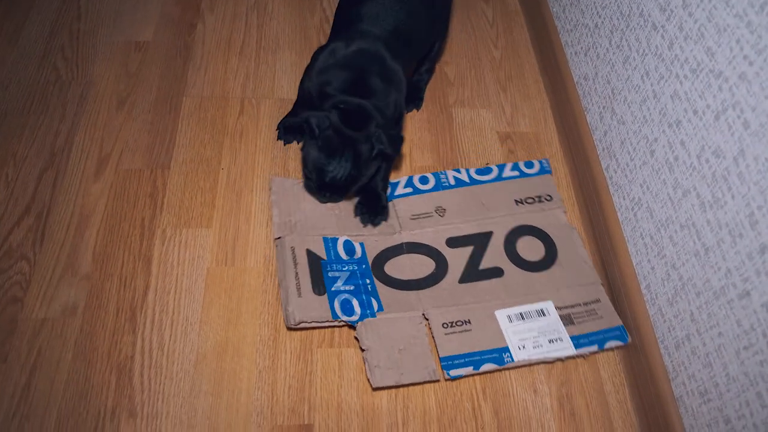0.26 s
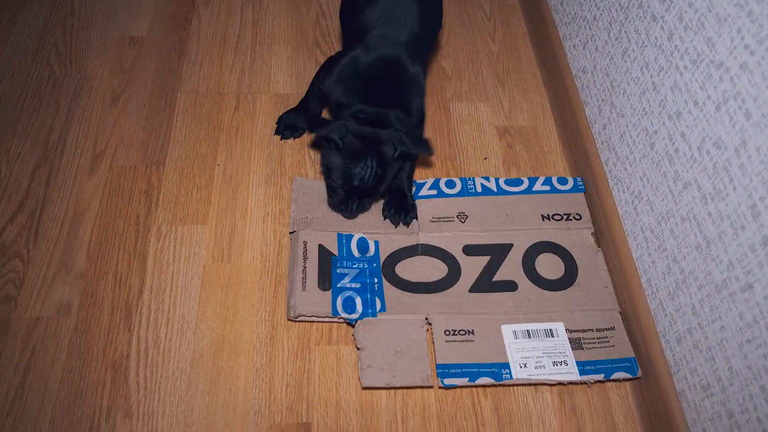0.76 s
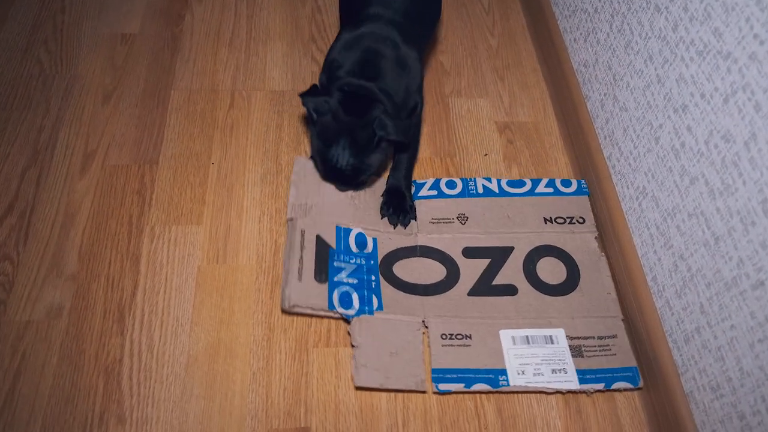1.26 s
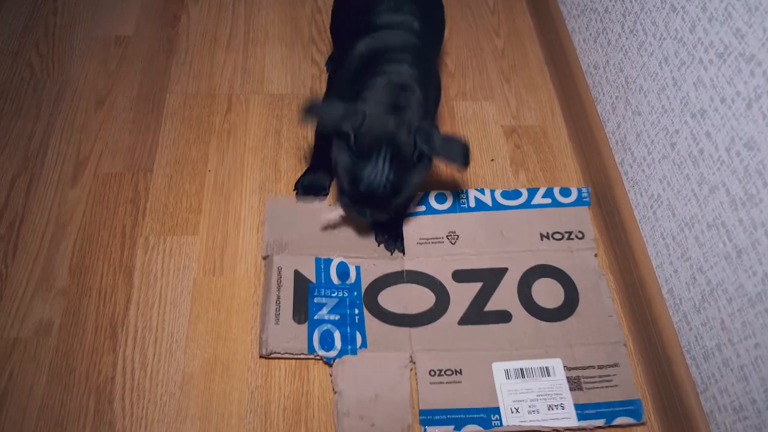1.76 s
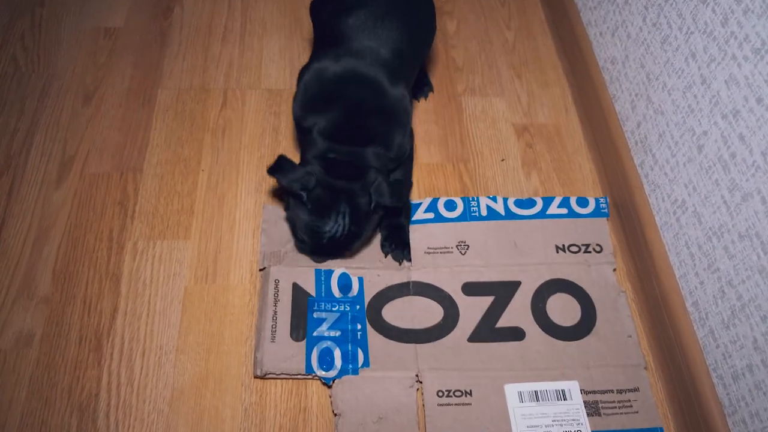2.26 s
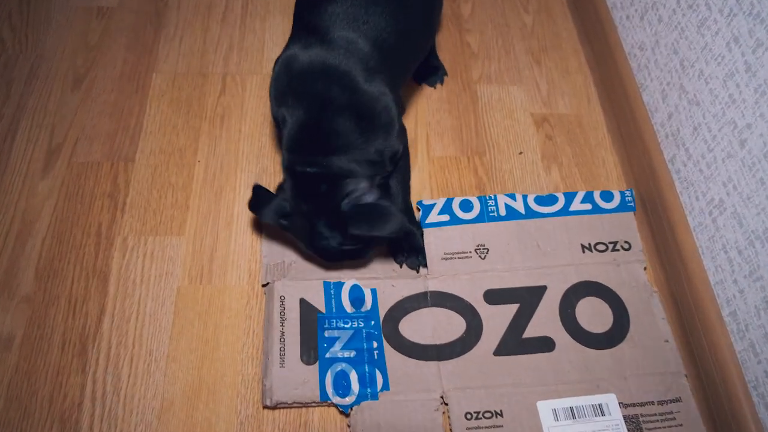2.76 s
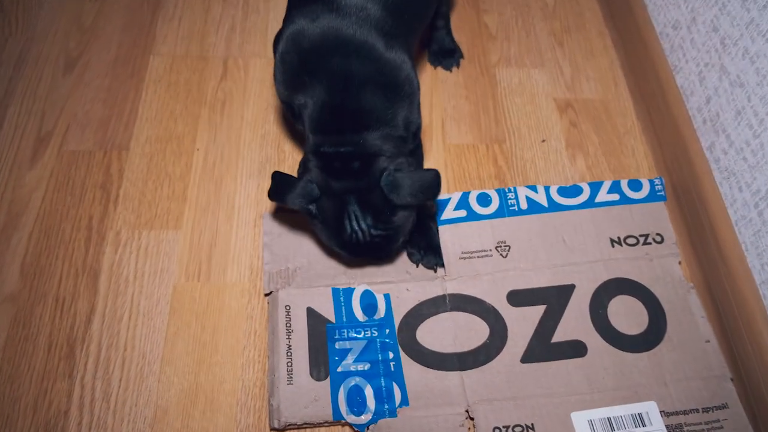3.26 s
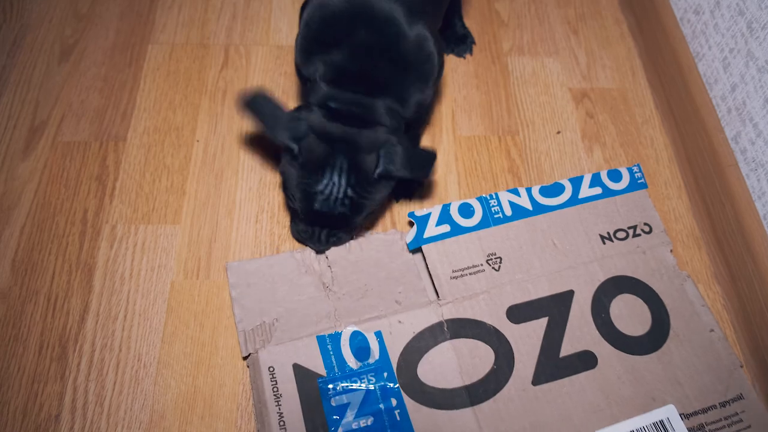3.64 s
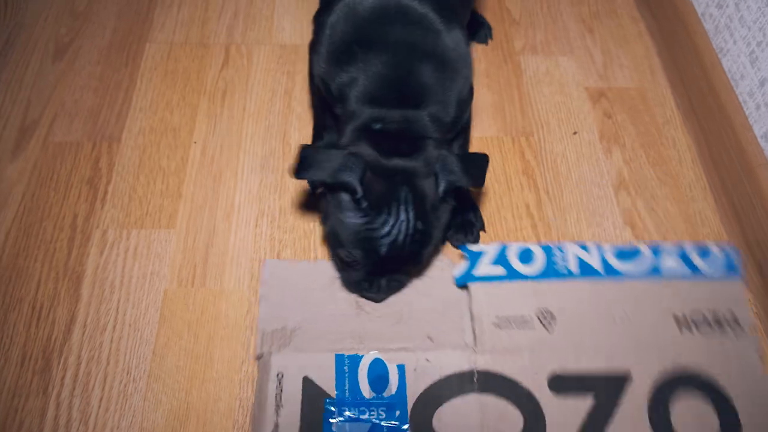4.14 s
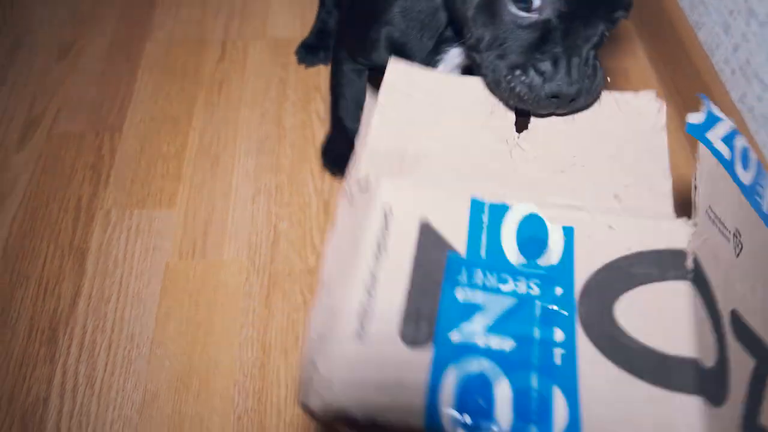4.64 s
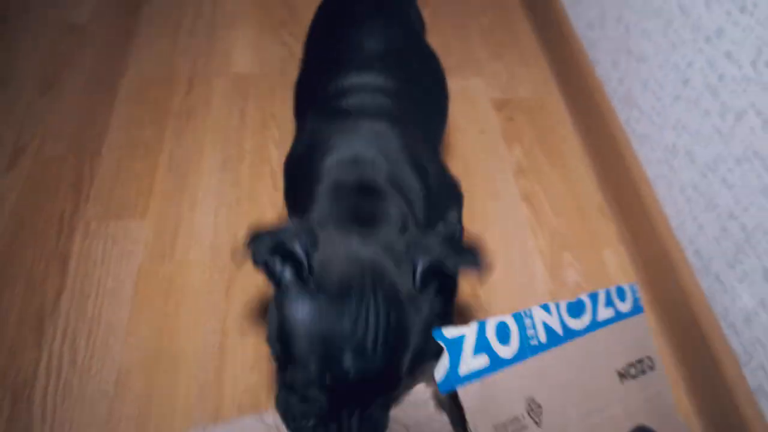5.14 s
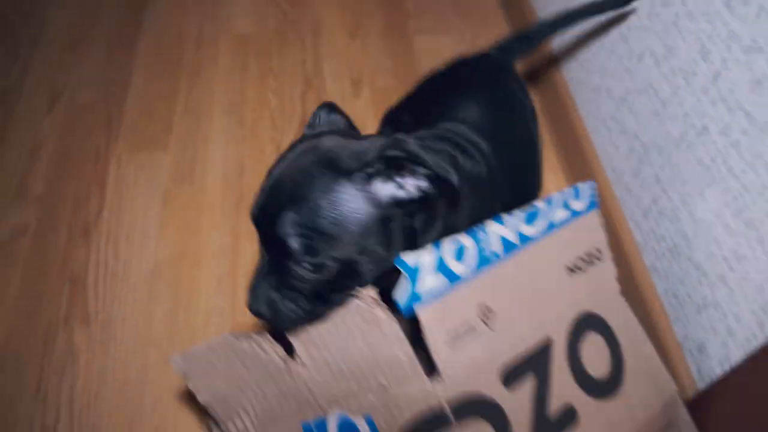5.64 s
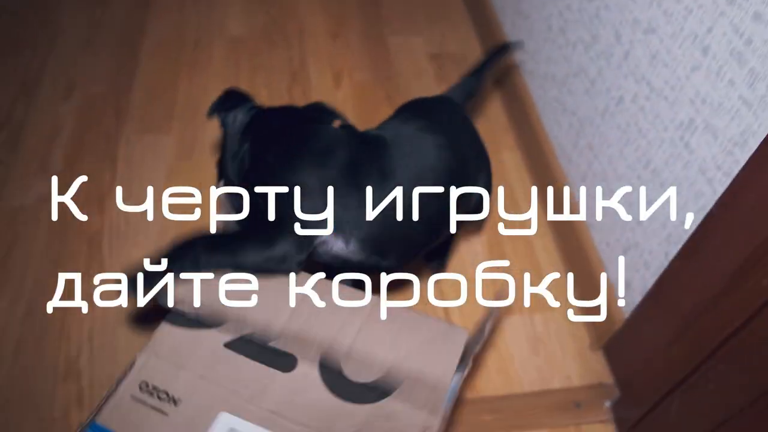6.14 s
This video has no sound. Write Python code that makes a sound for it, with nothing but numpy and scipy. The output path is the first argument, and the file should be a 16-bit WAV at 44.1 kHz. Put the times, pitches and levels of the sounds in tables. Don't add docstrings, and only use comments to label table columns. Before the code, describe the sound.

Close to the microphone, a puppy tears at a flat cardboard box on a wooden floor. A short groan and scrape open, then crisp snaps and crackles cluster, strongest before two seconds. Sparse scrapes, squeaky creaks and tiny tape ticks follow with near-silent gaps. Finally the box is pulled and shaken with hollow flaps, thuds and dense crackling. Short small-room reflections, faint steady air.

```python
import sys
import numpy as np
from scipy import signal
from scipy.fft import rfft, irfft, next_fast_len
from scipy.io import wavfile
from scipy.ndimage import uniform_filter1d, map_coordinates

SR = 44100
rng = np.random.default_rng(int(sys.argv[2]) if len(sys.argv) > 2 else 0)


def put_to_file(sound):
    columns = np.atleast_2d(sound).T
    safe = np.clip(columns, -1, 1)
    whole_steps = np.round(safe * 32767)
    wavfile.write(sys.argv[1], SR, whole_steps.astype(np.int16))


def invert_db(x):
    u = np.asarray(x, float) / 20
    return 10 ** u


N = 282240
CLOCK = np.arange(N) / SR
FAINT_KNOCK_DB = -36


def unit(x):
    return x / np.sqrt(np.mean(x ** 2) + 1e-20)


def along(points, hz):
    f, v = np.transpose(points)
    return np.interp(np.log(hz + 1), np.log(f + 1), v)


def wobble(rate):
    knots = rng.standard_normal(int(N * rate / SR) + 4)
    return map_coordinates(knots, [np.arange(N) * rate / SR])


def filtered(x, response):
    m = next_fast_len(N + 8192)
    return irfft(rfft(x, m) * response(np.fft.rfftfreq(m, 1 / SR)), m)[..., :N]


def rub(spectrum, grain_share, per_second, spread_db, patchy_db):
    # hz, likeness
    likeness = [(60, 0.87), (180, 0.957), (550, 0.885), (1200, 0.925), (2500, 0.1), (5000, 0.055),
                (15000, 0.52)]
    z = signal.stft(rng.standard_normal((2, N)), nperseg=256)[2]
    field = uniform_filter1d(rng.standard_normal(z.shape[1:]), size=4, axis=0)
    field = uniform_filter1d(field, size=12, axis=1)
    noise = unit(signal.istft(z * invert_db(patchy_db * unit(field)), nperseg=256)[1][:, :N])

    slipping = rng.random(N) < per_second / SR
    size_db = spread_db * np.minimum(rng.exponential(size=N), 3)
    push = np.clip(rng.standard_normal((2, N)), -2, 2)
    slips = unit(slipping * invert_db(size_db) * push)

    share = np.clip(grain_share, 0, 1)
    pair = np.sqrt(1 - share) * noise + np.sqrt(share) * slips

    def body(hz):
        turn = np.arccos(np.clip(along(likeness, hz), -1, 1)) / 2
        return invert_db(along(spectrum, hz)) * [np.cos(turn), np.sin(turn)]

    mid, side = filtered(pair, body)
    return unit(np.array([mid + side, mid - side]))


def strokes(s, length, db, rise, fall, fade_db=0):
    steepens = 7000
    t = np.arange(0, N / SR + .004, .002)[:, None]
    held = fade_db * np.clip((t - s) / (np.abs(length) + 1e-3), 0, 1)
    early = np.maximum(s - t, 0)
    late = np.maximum(t - s - length, 0)
    level = db + held - (rise + steepens * early) * early - fall * late
    return np.interp(CLOCK, t[:, 0], np.sqrt(np.sum(invert_db(2 * level), axis=1)))


def quiet_room():
    # hz, level_db (per Hz)
    air_colour = [(15, -32), (25, -3.5), (44, -18), (108, -16.5), (142, -27.5), (191, -19.5), (338, -27.5),
                  (431, -14.5), (921, -24), (1630, -14.5), (2250, -21.5), (15000, -35), (16300, -40)]
    return invert_db(-69.5) * rub(air_colour, grain_share=0, per_second=500, spread_db=0, patchy_db=0)


def groans():
    # start_s, length_s, start_hz, end_hz, level_db
    groan_list = [(0, .04, 205, 190, -47), (.05, .045, 390, 500, -52), (.105, .05, 215, 200, -50),
                  (4.74, .05, 1130, 1150, -58), (4.76, .035, 110, 130, -46), (5.558, .022, 3950, 4050, -43),
                  (.54, .08, 1030, 1020, -56), (1.315, .03, 430, 400, -35), (1.355, .035, 260, 250, -35),
                  (4.6, .13, 1100, 1000, -60), (2.55, .035, 4200, 3800, -62), (2.545, .04, 1300, 1300, -57),
                  (0, 0.2, 190.1, 204.1, -51), (0.036, 0.072, 202.4, 210.4, -42.5),
                  (2.345, 0.068, 293, 306, -59.5), (2.345, .074, 579.2, 612, -52),
                  (2.37, 0.154, 430.5, 463, -54.5), (2.44, 0.124, 599, 567, -62.5),
                  (2.959, 0.086, 253, 246, -53.5), (4.188, 0.078, 428.9, 406.4, -54.5),
                  (4.51, 0.135, 270.6, 220.6, -52), (1.1, 0.14, 201.3, 218.5, -54.5),
                  (2.26, 0.175, 1400, 1400, -49), (2.82, 0.1, 1980, 1960, -44),
                  (2.9, 0.27, 2000, 1906, -65), (.992, .07, 3050, 2500, -46),
                  (2.825, 0.065, 2282, 2270, -39)]
    # pitch_hz, level_db
    buzz = [(200, -6), (250, -22.5), (2000, -26)]
    out = np.zeros(N)
    flutter, throb = 1 + .06 * wobble(80), invert_db(4 * wobble(60))
    for s, length, from_hz, to_hz, db in groan_list:
        part = slice(round(s * SR), round((s + length) * SR))
        u = np.clip((CLOCK[part] - s) / length, 0, 1)
        hz = (from_hz + (to_hz - from_hz) * u) * flutter[part]
        turns = 2 * np.pi * np.cumsum(hz) / SR
        tone = np.sin(turns) + invert_db(along(buzz, from_hz)) * np.sin(2 * turns)
        out[part] += invert_db(db + 5.5) * np.sin(np.pi * u ** 0.609) ** 2 * tone
    return out * throb


def pull(bright, quicker):
    # start_s, board_db, hiss_above_board_db, time_to_die_by_20_db_s
    tug_list = [(0, -55, -0.5, 0.5), (0.072, -51.5, 3.5, 0.2449), (.14, -40, -6.5, 0.3),
                (.19, -33.5, -7.5, 0.15), (.23, -39.5, -24, 0.2031), (.68, -46.5, -4, 0.1551),
                (.98, -48, -6, 0.72), (1.3, -46.5, 7.5, 0.08), (1.37, -33, -28.5, 0.0018),
                (1.412, -46, 10, 0.1418), (1.572, -38, 0, 0.21), (1.692, -24, -2.5, 0.0655),
                (2.07, -70.5, 3.5, 2.06), (2.765, -51.5, 18.5, 0.1733), (3.912, -41, -3.5, 0.06),
                (4.03, -37.5, -8, 0.0651), (4.788, -52, 2, 0.1), (5.003, -31, -10, 0.0285),
                (5.17, -49, 12, 0.0856), (5.218, -35.5, -8, 0.4), (5.583, -25.5, -8.5, 0.1353),
                (5.785, -36, -9, 0.34), (5.853, -28, -5, 0.0533)]
    # start_s, length_s, board_db, hiss_above_board_db, fade_over_stroke_db
    slide_list = [(0.365, 0.2182, -41, -9, -9), (0.716, 0.136, -57.5, 1.5, 0),
                  (0.871, 0.089, -56, -1.5, 11.5), (1.036, 0.149, -59.5, -2, 1),
                  (1.239, 0.0687, -44.5, 1, 8), (1.411, 0.074, -35.5, -11.5, -3.5),
                  (1.738, 0.0943, -35, -10, -1.5), (2.232, 0.1784, -51.5, -0.5, 1.5),
                  (2.548, 0.097, -57, -3, -4.5), (2.701, 0.0936, -44.5, 0, 7),
                  (2.786, 0.0764, -38, -6.5, 1), (3.461, 0.1113, -38, -1.5, -0.5),
                  (3.614, 0.19, -49.5, -1.5, -8.5), (4.065, 0.1474, -46.5, 1, -3.5),
                  (4.198, 0.2155, -52.5, 0, 2.5), (4.489, 0.2047, -49, -3.5, -3), (4.875, 0.062, -50, 4, 4),
                  (5.042, 0.15, -43.5, -4, -1.5), (5.36, 0.165, -32.5, -5, 1.5),
                  (5.603, 0.1217, -38.5, -2.5, -2), (5.879, 0.086, -36, -2, 1),
                  (6.034, 0.141, -42.5, -5, 2), (6.187, 0.115, -41, -5.5, -3), (6.349, .05, -44, -5.5, 0.5),
                  (1.672, .035, -35, 0, 2), (2.69, .02, -50, 3, 0), (3.895, .06, -48, -3, -3),
                  (3.985, .03, -52, -6, 0), (4.755, .015, -53, -4, 0), (4.8, .07, -54, 0, -2),
                  (5.125, .07, -52, 8, 0), (5.34, .05, -38, 0, 0), (5.562, .03, -36, -3, 0),
                  (3.448, .015, -46, 3, 0), (.28, .07, -46, -14, -2), (5.26, .04, -38, -14, 0)]
    s, db, over_db, dies = np.transpose(tug_list)
    tugs = strokes(s, 0, db + bright * over_db, rise=449.5, fall=quicker * 20 / dies)
    s, length, db, over_db, fade_db = np.transpose(slide_list)
    slides = strokes(s, length, db + bright * over_db, rise=521.5, fall=quicker * 131, fade_db=fade_db)
    return np.hypot(slides, tugs)


def bent(x, peak_hz, boost_db, octaves):
    hz, t, z = signal.stft(x, SR, nperseg=512)
    centre = np.interp(t, CLOCK, peak_hz)
    bump = np.exp(-(np.log2((hz[:, None] + 1) / centre) / octaves) ** 2)
    return unit(signal.istft(z * invert_db(boost_db * bump), SR, nperseg=512)[1][:, :N])


def board_scrape():
    # hz, level_db (per Hz)
    board_colour = [(250, -47), (400, -14), (600, -7.5), (800, -5), (980, -1.5), (1190, -3.5), (1400, -3),
                    (1800, -2), (2400, -3.5), (3500, -12), (5300, -34), (9000, -38.5), (16000, -73)]
    # time_s, note_hz
    flap_note = [(0, 1900), (.3, 1400), (.6, 1030), (.9, 1650), (1.6, 1350), (1.75, 1000), (2.3, 1400),
                 (2.75, 1550), (2.86, 2000), (3.5, 1500), (4.0, 1120), (4.17, 1850), (4.5, 1180),
                 (4.72, 1000), (4.95, 1130), (5.5, 1450), (5.6, 1700), (6.4, 1500)]
    # time_s, resonance_hz
    fold = [(0, 1550), (.2, 1750), (.6, 1200), (.85, 1650), (1.69, 1100), (2.6, 1450), (2.87, 2050),
            (3.9, 1200), (4.201, 1600), (4.75, 1050), (5.47, 1430), (5.56, 1150), (5.7, 1400), (6.4, 1600)]
    shake = rub(board_colour, grain_share=0.29, per_second=1500, spread_db=0.5, patchy_db=3.0)
    shake = bent(shake, np.interp(CLOCK, *np.transpose(flap_note)), boost_db=2.6, octaves=0.16)
    return bent(shake, np.interp(CLOCK, *np.transpose(fold)), boost_db=4.0, octaves=0.53)


def polished(x):
    # time_s, tilt_db_per_octave
    gloss = [(0, -4), (.3, -4), (.5, 2), (.93, 8), (1.0, -3), (1.5, -2), (1.7, 4), (2.05, 1), (2.45, 4),
             (2.62, 4), (2.75, -3), (3.05, -3), (3.5, 2), (3.95, -1), (4.5, -1), (5.05, 2), (5.5, 0),
             (6.4, -3)]
    pivot_hz = 7000
    hz, t, z = signal.stft(x, SR, nperseg=512)
    octaves = np.log2(np.maximum(hz, pivot_hz) / pivot_hz)[:, None]
    tilt_db = octaves * np.interp(t, *np.transpose(gloss))
    return signal.istft(z * invert_db(tilt_db), SR, nperseg=512)[1][:, :N]


def surface_hiss():
    # hz, level_db (per Hz)
    hiss_colour = [(700, -60.5), (1500, -17), (2500, -4.5), (3500, -5.5), (4800, -7), (5500, -11),
                   (6700, -7.5), (9000, -11.5), (15000, -18), (16300, -22)]
    return polished(rub(hiss_colour, grain_share=0.08, per_second=1400, spread_db=5.5, patchy_db=1.86))


def sheet_boom(force):
    # start_s, length_s, level_db
    flap_list = [(0, 0.015, -42.5), (0.061, 0.011, -38.5), (.09, 0.12, -45.5), (0.298, 0.266, -61),
                 (0.69, 0.098, -52.5), (.87, .01, -54.5), (0.99, 0.012, -42), (1.149, 0.0072, -53.5),
                 (1.307, 0.015, -26), (1.365, .11, -33.5), (1.574, 0.0074, -32.5), (1.681, 0.0072, -25.5),
                 (1.753, 0.122, -39), (2.375, 0.044, -51.5), (2.0, .2, -65), (3.531, 0.0083, -45),
                 (3.725, 0.0077, -59.5), (3.996, 0.087, -51), (4.248, .01, -51), (4.537, 0.0776, -43.5),
                 (4.66, 0.052, -55), (4.784, .01, -45), (4.888, 0.053, -43), (5.046, 0.071, -46.5),
                 (5.213, 0.048, -35), (5.307, 0.0916, -32), (5.581, 0.24, -41.5), (5.834, 0.0107, -25),
                 (5.942, 0.09, -31.5), (6.076, 0.254, -41.5)]
    # hz, level_db (per Hz)
    sheet_colour = [(88, -41), (150, -12), (193, 0), (300, -1.5), (333, -12), (423, 1), (457, -4.5),
                    (515, 0.5), (556, -4.5), (617, -2), (800, -9), (1040, -36), (1760, -120)]
    flap = strokes(*np.transpose(flap_list), rise=300.5, fall=218)
    flap = np.hypot(flap, invert_db(-22.5) * force)
    boom = rub(sheet_colour, grain_share=0.2, per_second=200, spread_db=6.0, patchy_db=-0.5)
    return flap * invert_db(-7.5 + 0.35 * wobble(22)) * boom


def floor_thud():
    # start_s, length_s, level_db
    paw_list = [(0, 0.006, -60), (0.672, 0.189, -55.5), (1.3, 0.098, -57), (1.578, 0.0124, -50),
                (1.696, 0.117, -51), (1.852, 0.075, -52.5), (3.555, 0.057, -54), (4.061, 0.017, -52),
                (4.23, 0.0096, -56.5), (4.59, 0.0175, -62.5), (4.779, 0.0093, -47.5), (4.88, 0.0094, -49),
                (5.04, .25, -65), (5.355, 0.04, -43.5), (5.5, 0.3, -57.5), (5.815, 0.0074, -42),
                (5.958, .01, -51.5), (6.089, 0.034, -59.5), (6.278, 0.118, -48.5)]
    # hz, level_db (per Hz)
    floor_colour = [(12, -46.5), (25, -21), (45, -11), (68, 0.5), (80, -6.5), (100, 2), (125, -6.5),
                    (150, -20.5), (220, -47.5), (400, -100)]
    land = strokes(*np.transpose(paw_list), rise=350.5, fall=160)
    land = np.hypot(land, invert_db(-74.5))
    thud = rub(floor_colour, grain_share=0.12, per_second=51, spread_db=2.0, patchy_db=1.29)
    return land * invert_db(1.1 * wobble(11)) * thud


def drag():
    force = pull(bright=0, quicker=1)
    jerk = invert_db(1.3 * wobble(60))
    board = force * jerk * board_scrape()
    hiss = pull(bright=1, quicker=1.43) * jerk * surface_hiss()
    return board + hiss + sheet_boom(force) + floor_thud()


def snaps(events, tear_s, gain_db, swing, left_db):
    scatter_db = 1.5
    out, t = np.zeros((2, N + SR)), np.arange(2048) / SR
    f = np.fft.rfftfreq(len(t), 1 / SR)

    def mode(hz, width):
        return 1j * f * width / (hz * hz - f * f + 1j * f * width)

    def peak_one(x):
        return x / np.abs(x).max()

    swell = (t / tear_s) ** 2 * np.exp(-t / tear_s)
    treble = mode(5000, 9000) * mode(4000, 7000)
    dice = rng.random((len(events), 3))
    grit = rng.standard_normal((len(events), 3, len(t)))
    for (s, db, hz, crack_db, knock_db), d, g in zip(events, dice, grit):
        tear = rfft(g * swell)
        ripple = rfft(swing * np.sin(2 * np.pi * (hz * t + d[1])) * swell)
        body = mode(hz, .75 * hz) * mode(hz, 1.8 * hz) - invert_db(-5) * mode(1.9 * hz, 1.3 * hz) ** 2
        ring = peak_one(irfft((ripple + tear[0] + 0.41 * tear[1:]) * body))
        crack = peak_one(irfft((1.1 * tear[0] + tear[1:]) * treble))
        knock_swell = invert_db(-60 * t / 0.043) * (1 - np.exp(-t / 0.0046))
        knock = knock_swell * np.sin(2 * np.pi * (220 + 90 * d[0]) * t)
        snap = ring + invert_db(crack_db + 6.0) * crack + invert_db(knock_db + 6.11) * knock
        pan_db = left_db + scatter_db * (2 * d[2] - 1)
        start = max(round((s - .8 * tear_s) * SR), 0)
        out[:, start:start + len(t)] += invert_db(db + gain_db) * snap * invert_db([[pan_db / 2], [-pan_db / 2]])
    return out[:, :N]


def pinned_snaps():
    # time_s, peak_db, board_pitch_hz, crack_above_peak_db
    snap_list = [(0.131, -22, 2225, -30.5), (0.18, -4.5, 1460, -18), (0.689, -22.5, 1700, -17),
                 (0.951, -19.5, 1513, -15.5), (0.979, -3, 1400, -16), (1.23, -31, 1466, -7.5),
                 (1.263, -7, 1196, -15), (1.292, -9.5, 1440, -9.5), (1.323, -10.5, 1239, -33),
                 (1.345, -20, 1500, -19), (1.407, -12.5, 983, -10.5), (1.563, -7, 1112, -12),
                 (1.659, -15, 1248, -12), (1.678, -11.5, 1270, -11), (1.688, -10, 875, -8),
                 (1.838, -14.5, 1325, -21), (2.225, -24.5, 1387, -21.5), (2.261, -32, 1670, -20)]
    events = np.insert(snap_list, 4, FAINT_KNOCK_DB, axis=1)
    return snaps(events, tear_s=.0007, gain_db=2.0, swing=0.37, left_db=0.3)


def fibre_crackles():
    # time_s, peak_db, board_pitch_hz, crack_above_peak_db
    crackle_list = [(0.144, -25, 1550, -22), (0.194, -16, 1600, -20), (0.389, -28, 1340, -24),
                    (0.752, -36, 1500, -21), (0.993, -23, 2860, -20), (1.279, -19, 1600, -20),
                    (1.331, -18, 1880, -25), (1.398, -13, 1500, -21), (1.418, -20, 1770, -19),
                    (1.444, -23, 1730, -20), (1.55, -28, 1440, -26), (1.612, -21, 1480, -23),
                    (1.663, -12, 1220, -23), (1.672, -13, 910, -17), (1.683, -8, 1360, -15),
                    (1.692, -8, 1240, -19), (1.71, -17, 1800, -14), (1.749, -20, 1500, -24),
                    (1.926, -36, 1370, -30), (2.247, -30, 1440, -26), (2.573, -43, 1310, -16),
                    (2.844, -21, 2270, -19), (3.481, -25, 1410, -21), (3.527, -26, 1540, -16),
                    (3.565, -27, 1400, -11), (4.023, -27, 1050, -24), (4.03, -28, 1240, -21),
                    (4.07, -33, 1660, -14), (4.492, -28, 1140, -28), (4.784, -34, 945, -15),
                    (4.864, -38, 1140, -10), (4.899, -33, 2400, -10), (5.337, -18, 1080, -23),
                    (5.379, -18, 1120, -19), (5.469, -19, 1880, -23), (5.567, -9, 915, -27),
                    (5.579, -13, 942, -25), (5.585, -14, 1000, -25), (5.777, -26, 1480, -23),
                    (5.824, -21, 1680, -20), (5.835, -17, 754, -23), (5.865, -18, 1500, -22),
                    (5.969, -20, 1170, -20), (6.181, -27, 1410, -21), (6.252, -23, 2160, -23),
                    (6.297, -29, 1410, -24)]
    events = np.insert(crackle_list, 4, FAINT_KNOCK_DB, axis=1)
    return snaps(events, tear_s=.0009, gain_db=-1.5, swing=0.3, left_db=-.3)


def soft_bites():
    # time_s, peak_db, board_pitch_hz, crack_above_peak_db, knock_above_peak_db
    bite_list = [(0.381, -28, 1422, -25.5, -34.5), (0.443, -24, 1050, -22.5, -40),
                 (0.668, -28.5, 1487, -16.5, -11.5), (1.255, -14, 1139, -10.5, -32.5),
                 (1.393, -11.5, 1723, -16, -9), (1.574, -11.5, 1685, -11.5, -19.5),
                 (1.789, -22, 983, -20.5, -11.5), (1.822, -20, 1293, -30.5, -19.5),
                 (2.242, -28.5, 1348, -30, -34.5), (2.694, -29, 1096, -12.5, -27.5),
                 (2.827, -21, 2239, -17.5, -32.5), (3.715, -33.5, 625, -24.5, -51.5),
                 (3.973, -28.5, 1084, -14, -23.5), (4.489, -25, 1232, -34, -19),
                 (4.594, -30.5, 1056, -15.5, -9.5), (4.776, -32, 944, -8, -4),
                 (5.003, -23, 611, -28.5, -23), (5.227, -26, 1522, -27, 5.5),
                 (5.305, -13, 538.6, -23.5, -11.5), (5.57, -8.5, 864.2, -18.5, -23),
                 (5.601, -14.5, 1596, -16.5, -18), (5.95, -17.5, 1066, -23, -14.5),
                 (6.25, -30, 2098, -24, -25.5)]
    return snaps(bite_list, tear_s=0.0034, gain_db=-2.5, swing=0.25, left_db=-0.97)


def tape_ticks():
    # time_s, peak_db, pitch_hz
    tick_list = [(0.6414, -54, 8060), (0.9502, -24, 11500), (1.1827, -43, 12000), (1.1964, -50, 10100),
                 (1.2104, -46, 11000), (2.0717, -51, 11000), (2.0774, -52, 11000), (2.0964, -59, 11000),
                 (2.5724, -51, 12400), (3.0784, -61, 11000), (3.4534, -30, 9000), (3.5694, -28, 10400),
                 (3.7324, -45, 12000), (3.909, -39, 9390), (4.0885, -34, 7730), (4.1894, -34, 9000),
                 (4.7905, -29, 10400), (5.0654, -38, 11000), (5.1228, -34, 11000), (5.254, -33, 8070)]
    events = [(*row, -12, -60) for row in tick_list]
    return snaps(events, tear_s=.0004, gain_db=-0.2, swing=0.05, left_db=-1.5)


def shaken_snaps():
    # time_s, peak_db, board_pitch_hz, crack_above_peak_db, knock_above_peak_db
    shake_list = [(4.017, -25, 1206, -18, -21.5), (4.79, -36, 943, -1.5, -12.5),
                  (4.984, -15.5, 1150, -19, -27.5), (5.211, -21, 875, -11, -13.5),
                  (5.332, -15, 1060, -40, -19), (5.533, -11, 966, -24, -34),
                  (5.557, -10, 989, -21.5, -26.5), (5.694, -24, 681, -11.5, -31),
                  (5.819, -18.5, 900, -20.5, -10), (5.85, -11.5, 2000, -13, -17.5),
                  (5.934, -19, 833, -10, -8.5), (6.016, -19.5, 883, -23, -13)]
    return snaps(shake_list, tear_s=.0007, gain_db=2.0, swing=0.297, left_db=0.0)


def room(x):
    # hz, t60_s
    decay = [(150, .5), (1500, 0.2655), (5000, 0.26), (14000, 0.11)]
    out, step = np.zeros((2, N + 2 * SR)), SR // 3
    high_pass = signal.butter(1, 1500, "high", fs=SR)
    for a in range(0, N, step):
        hz, t, z = signal.stft(rng.standard_normal((2, SR // 2)), SR, nperseg=256)
        dying = invert_db(-60 * t / along(decay, hz)[:, None])
        tail = signal.istft(z * dying, SR, nperseg=256)[1]
        tail = tail[0] + signal.lfilter(*high_pass, tail[1]) * [[1], [-1]]
        wet = signal.fftconvolve(x[None, a:a + step], tail / np.linalg.norm(tail[0]), axes=1)
        out[:, a + 420:a + 420 + wet.shape[1]] += wet
    return out[:, :N]


def scene():
    air, hum, slide = quiet_room(), groans(), drag()
    tears = pinned_snaps() + fibre_crackles() + soft_bites() + tape_ticks() + shaken_snaps()
    walls = room(invert_db(-7.5) * tears.mean(0) + invert_db(-10) * slide.mean(0) + invert_db(-6.0) * hum)
    return tears + invert_db(1.5) * slide + hum + walls + air


def low_pass(x):
    return signal.sosfilt(signal.butter(12, 16450, fs=SR, output="sos"), x)


def record(dry):
    # hz, left_over_right_db
    tilt = [(60, 0.5), (180, -1), (550, -0.5), (1650, -1.5), (4970, 1), (15000, -3)]

    def ports(hz):
        roll_db = -np.clip(.12 * (hz - 15800), 0, 90)
        return invert_db(np.outer([.5, -.5], along(tilt, hz)) + roll_db)

    return low_pass(filtered(dry, ports))


dry = scene()
out = record(dry)
put_to_file(out)
```